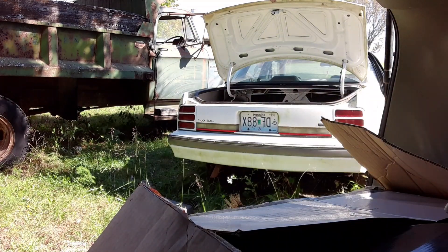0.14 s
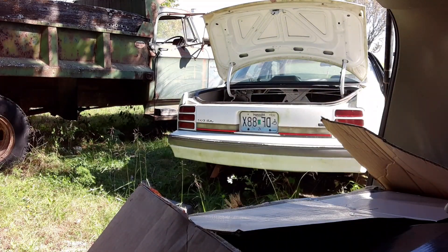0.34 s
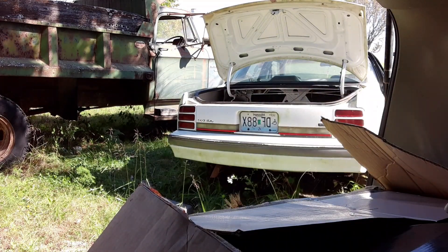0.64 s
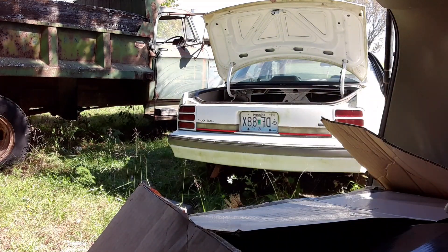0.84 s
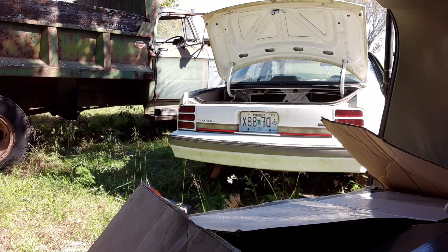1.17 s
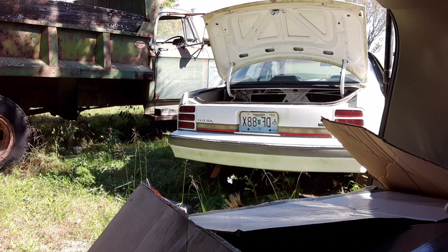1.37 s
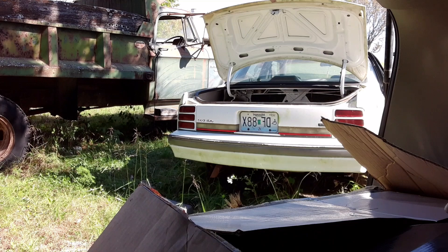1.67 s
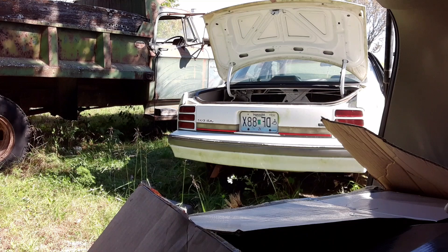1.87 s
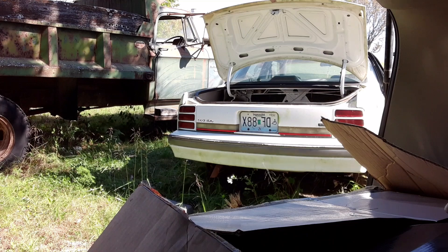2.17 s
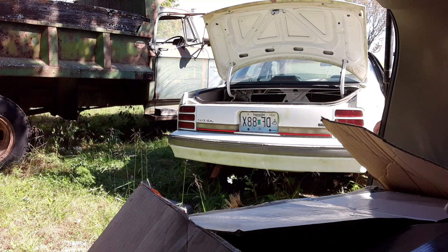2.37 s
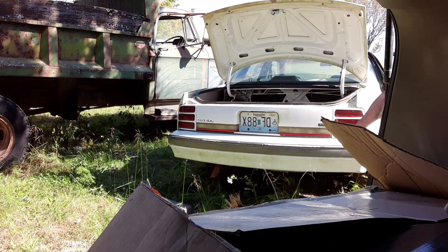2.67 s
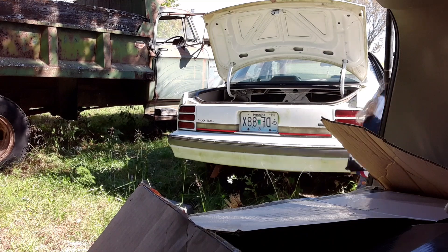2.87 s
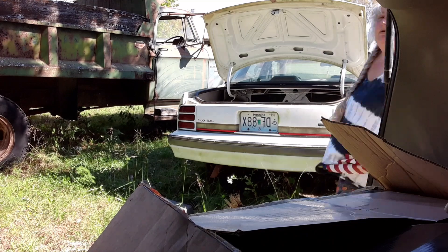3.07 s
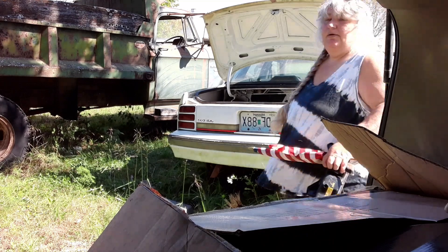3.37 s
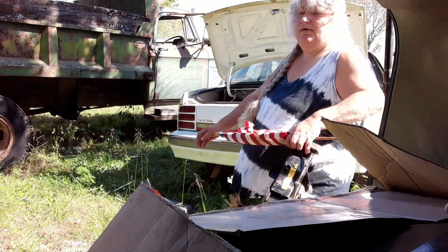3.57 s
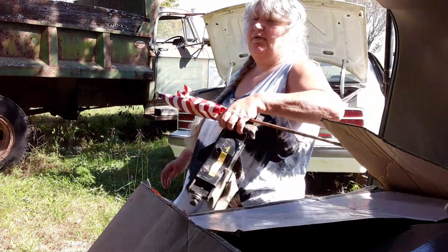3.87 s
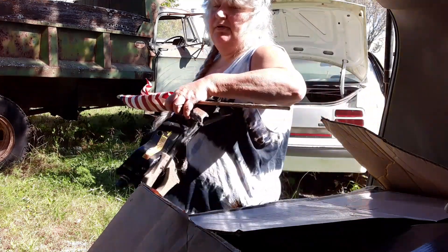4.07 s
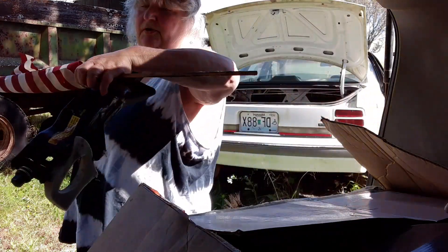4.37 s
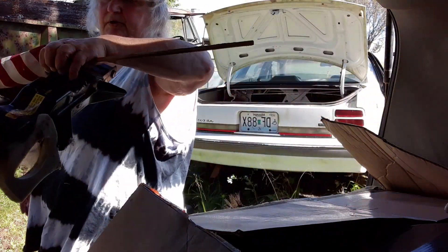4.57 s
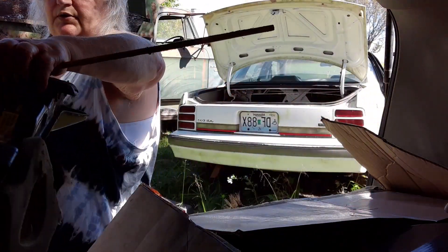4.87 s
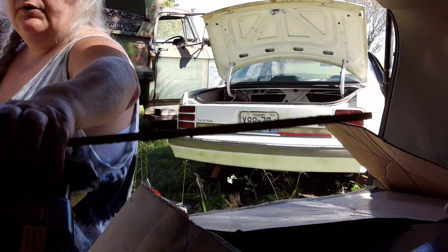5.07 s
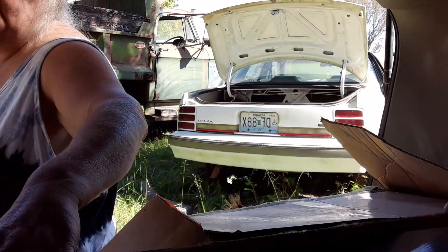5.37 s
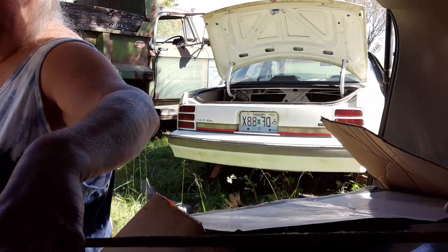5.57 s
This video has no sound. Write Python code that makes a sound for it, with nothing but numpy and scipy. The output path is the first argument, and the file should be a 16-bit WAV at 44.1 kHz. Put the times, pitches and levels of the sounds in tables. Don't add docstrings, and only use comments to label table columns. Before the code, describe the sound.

Outdoors in a quiet grassy yard, a cricket chirps clear pulses three times a second. A thin, very high katydid buzz swells and cuts off near four seconds. Footsteps rustle and snap through dry grass, coming closer. At about five seconds an armful of objects bangs onto cardboard right by the microphone, bounces and settles. Stereo, louder on the left.

```python
import sys
import numpy as np
from scipy import signal
from scipy.fft import rfft, irfft, next_fast_len
from scipy.io import wavfile
from scipy.ndimage import uniform_filter1d

SR = 44100
rng = np.random.default_rng(int(sys.argv[2]) if len(sys.argv) > 2 else 0)


def rack_gain(trim_db):
    fader = np.asarray(trim_db, float)
    return 10 ** (fader / 20)


def generate_wav(sig):
    pcm = np.round(np.clip(np.atleast_2d(sig).T, -1, 1) * 32767).astype(np.int16)
    wavfile.write(sys.argv[1], SR, pcm)


N = 252246

# start_s [s], level_db [dB]
CHIRP_TIMES = [(0.126, -38), (0.425, -37.5), (0.75, -36.5), (1.06, -37), (1.388, -38), (1.723, -37.5),
               (2.03, -35.5), (2.358, -36.5), (2.667, -36.5), (2.986, -36), (3.294, -37), (3.635, -36),
               (3.97, -36.5), (4.305, -36.5), (4.632, -39), (4.962, -40.5), (5.29, -39), (5.628, -46)]
# delay_s [s], level_db [dB], strong_part_s [s], top_pitch_hz [Hz]
WING_STROKES = [
    (0, -1.5, .018, 4670),
    (.031, 0, .021, 4740),
    (.067, 0, .021, 4740),
]
# delay_s [s], level_db [dB]
ECHO_PATHS = [
    [(0, -3.5), (.007, -21), (.013, -20)],
    [(.0005, -3), (.006, -13.5), (.013, -14.5)],
]
# frequency_hz [Hz], gain_db [dB]
PORT_INTERFERENCE = [
    [(4150, -6), (4400, -3.5), (4520, 0.5), (4660, -7), (4900, 0), (9000, 0.5)],
    [(4150, -15), (4400, -11), (4530, -6), (4650, 1.5), (4900, 2), (9000, 5)],
]


def cricket():
    climb_hz, climb_s, sag_hz = 260, 0.003, 330
    trail_db, catch_share = -14, 0.75
    out = np.zeros((2, N))
    for (start_s, chirp_db), chances in zip(CHIRP_TIMES, rng.standard_normal((len(CHIRP_TIMES), 3, 12))):
        for (delay_s, stroke_db, strong_s, top_hz), chance in zip(WING_STROKES, chances):
            pitch_c, length_c, depth_c, place_c, time_c, sag_c = chance[[0, 7, 8, 9, 10, 11]]
            t = np.arange(0, 1.5 * strong_s, 1 / SR)
            progress = t / (strong_s * (1 + 0.04 * length_c))

            climb = climb_hz * np.exp(-t / climb_s)
            sag = (sag_hz + 25 * sag_c) * 1.7 * np.tanh(progress ** 2.2 / 1.4)
            waver = 14 * uniform_filter1d(rng.standard_normal(len(t)), 60) * np.sqrt(60)
            phase = 2 * np.pi * np.cumsum(top_hz + 12 * pitch_c - climb - sag + waver) / SR

            depth = np.clip(catch_share + 0.25 * depth_c, 0, 1)
            catch = 1 - depth * np.exp(-((progress - 0.57 - 0.05 * place_c) / 0.075) ** 2)
            trail = rack_gain(trail_db / (1 + np.exp((0.84 - progress) / 0.025)))
            rounded_ends = np.sin(np.pi * t / len(t) * SR) ** 0.3
            swell = (1 - np.exp(-t / 0.002)) * (0.75 + progress ** 3) * catch * trail * rounded_ends
            stroke = swell * (np.sin(phase) + rack_gain(-25.0) * np.sin(2 * phase))

            for port, paths in enumerate(ECHO_PATHS):
                for (path_s, path_db), sway in zip(paths, chance[1 + 3 * port:]):
                    arrival_s = start_s + delay_s + 0.0007 * time_c + path_s + abs(0.0004 * sway)
                    level_db = chirp_db + 4.5 + stroke_db + path_db + 0.8 * sway
                    add(out[port], arrival_s, rack_gain(level_db) * stroke)
    heard = shaped(out, lambda hz: rack_gain(np.array([read(curve, hz) for curve in PORT_INTERFERENCE])))
    return heard + rack_gain(-12.0) * scatter(out[0], 0.15)


# time_s [s], level_db [dB], near_share [0-1, power of the near singer]
BUZZ_COURSE = [
    (0, -57, 0.3),
    (.7, -56.5, 0.24),
    (1.3, -56.5, 0.1),
    (1.8, -54.5, 0.4),
    (2.2, -54.5, .45),
    (2.5, -53.5, 0.74),
    (2.9, -49.5, 0.73),
    (3.3, -46.5, 0.63),
    (3.7, -45, 0.4),
    (4.02, -43, 0.55),
]
# frequency_hz [Hz], level_db [dB]
NEAR_WING_SPECTRUM = [(9000, -38), (11500, -21), (12700, -15), (13300, -6), (13900, 1), (14450, -5),
                      (15100, 0.5), (16000, -4)]
# frequency_hz [Hz], level_db [dB]
FAR_WING_SPECTRUM = [(9000, -30), (11500, -12), (13000, -6), (14200, -3), (15000, 0), (16000, 0)]


def katydid():
    sweeps_per_s, bounce_s = 30.7, 0.001224
    t = np.arange(N) / SR
    level_db, near = columns(BUZZ_COURSE)
    near = np.clip(near, 0, 1)
    unsteady = 0.5 * evened(uniform_filter1d(rng.standard_normal(N), 1500))
    phase = 2 * np.pi * (sweeps_per_s * t - 0.5) + unsteady
    sweep = (0.5 + 0.5 * np.cos(phase)) ** 0.65
    teeth = evened(sweep * grains(1800, 1.8, 0.0016))
    effort = rack_gain(level_db + 7.0) * np.clip((4.01 - t) / 0.0062, 0, 1)
    close = colour(effort * np.sqrt(near) * teeth * rng.standard_normal((2, N)), NEAR_WING_SPECTRUM)
    close = 0.97 * close + 0.25 * np.roll(close, round(bounce_s * SR), axis=1)
    far = colour(effort * np.sqrt(1 - near) * rng.standard_normal((2, N)), FAR_WING_SPECTRUM)
    return close + far


# start_s [s], hold_s [s], cardboard_db [dB], boom_db [dB re cardboard]
LOAD_CONTACTS = [
    (5.035, 0.1, -58.5, 11),
    (5.159, 0.087, -51, 11.5),
    (5.229, 0.032, -26.5, -3),
    (5.261, 0.057, -25.5, -12),
    (5.364, 0.01, -24, -3),
    (5.416, 0.071, -40, -5),
    (5.506, 0.036, -54, 10),
    (5.557, 0.13, -53.5, -11),
]
# spectrum [Hz, dB], grain_rate [1/s], grain_spread_db [dB]
LOAD_LAYERS = [
    ([(90, -6.5), (180, 2.5), (320, 0.5), (450, -6.5), (800, -6.5), (1100, -9), (1600, -25)], 440, 2.45),
    ([(30, -35), (42, -27), (52, 4), (66, 2), (85, 9), (120, -10), (170, -25.5)], 400, 2.1),
]
# rise [dB/s], fall [dB/s]
LOAD_RATES = [
    (1500, 640),
    (900, 660),
]
# start_s [s], hold_s [s], scrape_db [dB], clatter_db [dB re scrape]
SLIDE_CONTACTS = [(5.013, 0.012, -47.5, -5.5), (5.063, 0.09, -52, -19), (5.129, 0.047, -45, -8),
                  (5.17, 0.018, -57, 0), (5.351, 0.017, -34.5, -1), (5.238, .004, -38, 6),
                  (5.258, 0.018, -32, 3), (5.283, 0.021, -29.5, 10), (5.306, 0.019, -27, 8),
                  (5.337, 0.032, -43, 5.5), (5.424, 0.022, -40.5, -1), (5.45, 0.0098, -35, -7),
                  (5.506, 0.13, -53, 0.5), (5.543, .008, -51, -20), (5.586, 0.0039, -44, -28),
                  (5.614, .012, -52, -30)]
# spectrum [Hz, dB], grain_rate [1/s], grain_spread_db [dB]
SLIDE_LAYERS = [
    ([(3000, -14), (5000, -9.5), (8000, -7), (12000, -7), (16000, -12)], 2900, 1.73),
    ([(800, -3.5), (1300, -6), (1900, -4), (2600, -4.5), (4000, -9), (6000, -15)], 550, 2),
]
# rise [dB/s], fall [dB/s]
SLIDE_RATES = [
    (1300, 1300),
    (1300, 350),
]


def load():
    span_s = (4.98, 5.72)
    landing = rustle(span_s, LOAD_CONTACTS, LOAD_LAYERS, LOAD_RATES)
    return landing + rack_gain(1.0) * rustle(span_s, SLIDE_CONTACTS, SLIDE_LAYERS, SLIDE_RATES)


# start_s [s], peak_db [dB], ring_hz [Hz],
# t60_s [s]
HARD_KNOCKS = [(5.036, -43, 304, 0.18), (5.015, -49, 488, 0.1), (5.058, -39, 347, 0.14),
               (5.9, -42, 310, 0.11), (5.113, -42, 289, .15), (5.065, -40, 68, 0.24), (5.16, -37, 64, 0.41),
               (2.098, -31, 3670, 0.0079), (2.098, -44, 2600, .006), (5.166, -39.5, 1000, 0.09),
               (5.37, -25.5, 2750, 0.025), (5.422, -40, 2700, .06), (5.445, -43, 2800, .05),
               (5.545, -47.5, 690, .07), (5.45, -40.5, 69, .25), (5.5, -41, 58, 0.24), (5.39, -33, 150, .1),
               (5.211, -30.5, 187, 0.071), (5.226, -24.5, 1100, 0.008), (5.228, -21.5, 2200, 0.015),
               (5.279, -10.5, 813, 0.027), (5.284, -16.5, 154, 0.053), (5.295, -17, 196, 0.043),
               (5.251, -20.5, 180, .05), (5.323, -18, 317, 0.029), (5.312, -21, 820, .05),
               (5.279, -9.5, 2590, 0.015), (5.229, -21.5, 300, 0.13), (5.269, -18, 210, 0.033),
               (5.295, -15.5, 2840, 0.033), (5.310, -11.5, 637, 0.024), (5.318, -27, 560, 0.018),
               (5.363, -21, 135, 0.035), (5.369, -19, 235, 0.041), (5.464, -29.5, 2460, 0.021),
               (5.29, -27, 84, 0.31), (5.4, -34.5, 74.5, 0.23), (5.283, -14.5, 880, 0.033),
               (5.18, -43, 1050, 0.094), (6.1, -43, 820, 0.13), (6.2, -44.5, 207, 0.071),
               (5.344, -19.5, 3600, 0.02), (5.511, -46, 5850, 0.02), (6.2, -42, 4740, 0.035),
               (7.3, -34, 4030, 0.015)]
# start_s [s], peak_db [dB], ring_hz [Hz], t60_s [s]
STALK_SNAPS = [(.34, -60, 2250, 0.033), (.348, -38, 2400, 0.033), (.356, -50, 2230, 0.037),
               (.349, -57, 670, 0.079), (.352, -57, 3390, .06), (.365, -63, 2270, .1),
               (.404, -58, 2360, 0.05), (.425, -64, 2330, .1), (.38, -61, 2420, .06),
               (.59, -59.5, 252, 0.084), (1.26, -54.5, 442, 0.28), (2.17, -51, 1500, 0.015),
               (2.755, -38.5, 2470, 0.033), (2.765, -56, 2320, .025), (1.97, -55, 2600, 0.027),
               (2.87, -57, 181, 0.11), (.52, -60, 173, 0.14), (3.145, -55, 634, 0.03),
               (3.224, -27.5, 590, 0.024), (3.28, -36, 420, 0.017), (3.187, -46, 620, .03),
               (3.228, -42, 170, 0.047), (3.287, -44, 1490, .04), (3.364, -55, 567, 0.1),
               (3.39, -54, 220, 0.18), (3.408, -50, 1400, 0.024), (3.49, -57.5, 1950, 0.088),
               (3.505, -52, 592, 0.14), (3.59, -55, 583, 0.21), (3.63, -55, 690, 0.14),
               (3.66, -45, 594, 0.056), (3.728, -38, 725, 0.028), (3.777, -40, 1340, 0.033),
               (3.777, -37.5, 576, 0.032), (3.795, -35, 1370, 0.018), (3.923, -50, 385, 0.044),
               (4.082, -54.5, 560, 0.043), (4.197, -55, 680, .04), (4.228, -41.5, 1920, 0.045),
               (4.789, -54, 890, 0.05), (4.803, -55, 854, .06), (4.68, -57, 660, .05),
               (4.72, -57, 686, .05), (4.836, -54.5, 398, .04), (3.835, -36, 392, 0.04),
               (3.866, -37, 330, 0.036), (3.972, -42.5, 450, 0.046), (4.41, -43.5, 350, 0.12),
               (4.545, -48, 462, 0.075), (4.643, -48, 474, 0.054)]


def blows():
    direct = knocks(STALK_SNAPS, 0.0018, crack_db=-40) + knocks(HARD_KNOCKS, 0.00042, crack_db=-21)
    return direct + rack_gain(-7) * scatter(direct, 0.057)


# start_s [s], peak_db [dB], lowest_hz [Hz]
EDGE_TICKS = [(2.098, -45, 1800), (2.172, -54, 1200), (3.779, -51, 900), (3.8, -58, 1200),
              (4.228, -42, 1500), (5.018, -40, 2050), (5.228, -25, 6000), (5.272, -33, 9000),
              (5.282, -20, 3000), (5.287, -33, 7000), (5.3, -20, 3000), (5.31, -11, 2500),
              (5.313, -30, 5000), (5.293, -26, 2000), (5.322, -26, 2000), (5.327, -35, 4000),
              (5.333, -29, 2500), (5.344, -32, 2000), (5.368, -28, 2500), (5.246, -34, 2000),
              (5.262, -32, 1500), (5.352, -23, 8000), (5.381, -25, 8000), (5.454, -42, 5950),
              (5.511, -45, 3000), (5.549, -38, 3000), (5.589, -36, 3000), (5.62, -38, 8000)]


def ticks():
    t, out = np.arange(600) / SR, np.zeros((2, N))
    for (start_s, peak_db, low_hz), noise in zip(EDGE_TICKS, rng.standard_normal((len(EDGE_TICKS), 2, len(t)))):
        crack = shaped(noise * np.exp(-t / 0.0016), lambda hz: 1 / np.sqrt(1 + (low_hz / (hz + 1)) ** 4))
        add(out, start_s, rack_gain(peak_db) * crack)
    return out


# start_s [s], hold_s [s], thud_db [dB], ground_db, crunch_db [dB re thud]
FOOT_CONTACTS = [(1.171, .03, -73.5, 9, 9.5), (1.248, 0.072, -59, -13, -3.5), (1.56, 0.25, -68, -15, 0.5),
                 (1.98, 0.17, -68.5, -15, 5), (2.141, 0.048, -56, -15, -2.5), (2.297, .1, -91, 9, -5),
                 (2.593, 0.073, -60.5, -14, 3.5), (2.706, 0.059, -52, -13, -3.5),
                 (2.84, 0.026, -66.5, 0, -25), (3.15, 0.0075, -53, -21, 4.5), (3.218, 0.07, -48.5, -9, 0.5),
                 (3.383, 0.009, -63.5, 3, 0), (3.443, 0.4, -64.5, -22, 7), (3.786, 0.018, -60, -14, 12.5),
                 (3.836, 0.012, -46, -9, -17), (3.948, 0.065, -55.5, -24, -2.5),
                 (4.224, 0.035, -63.5, -12, 10), (4.362, 0.07, -61.5, -25, 9.5),
                 (4.494, 0.23, -65.5, -3, 3.5), (4.798, 0.1, -68.5, -0.5, 8)]
# spectrum [Hz, dB], grain_rate [1/s], grain_spread_db [dB]
FOOT_LAYERS = [
    ([(70, -35), (130, -3.5), (200, -1), (400, -4), (600, -26)], 600, 3.1),
    ([(20, -38), (42, 3), (60, 17), (100, 8), (150, -14)], 99, 2.5),
    ([(300, -14.5), (450, 2.5), (620, 7), (800, 0.5), (1400, -6.5), (2000, -20.5)], 460, 2.9),
]
# rise [dB/s], fall [dB/s]
FOOT_RATES = [
    (252, 168),
    (150, 100),
    (260, 110),
]
# start_s [s], hold_s [s], swish_db [dB], stalks_db [dB re swish]
BRUSH_CONTACTS = [(1.225, 0.046, -62, -3), (1.43, 0.023, -58, -32), (1.594, 0.89, -60.5, -12.5),
                  (2.094, 0.011, -53.5, -5.5), (2.206, 0.45, -69, -22), (2.577, 0.1, -54, -10),
                  (2.728, 0.043, -47.5, -6), (2.845, 0.46, -57.5, -21), (3.144, 0.0065, -44, -8.5),
                  (3.264, 0.028, -49.5, -6), (3.33, 0.22, -54.5, -9), (3.647, 0.06, -49.5, -5.5),
                  (3.796, 0.011, -58, 5), (3.822, 0.018, -48.5, -17), (3.867, 0.21, -60.5, -2),
                  (4.219, 0.035, -43, -10.5), (4.333, 0.051, -51.5, -6), (4.425, 0.074, -63, 4),
                  (4.547, .02, -53.5, -8.5), (4.624, 0.19, -62, -3), (4.778, 0.091, -59, -3.5)]
# spectrum [Hz, dB], grain_rate [1/s], grain_spread_db [dB]
BRUSH_LAYERS = [
    ([(3500, -18.5), (6500, 2.5), (10000, 7), (13000, 10.5), (16000, 4.5)], 3400, 1.6),
    ([(700, -26), (1300, 0.5), (2500, 1.5), (5000, -2), (7000, -6.5)], 1600, 3.6),
]
# rise [dB/s], fall [dB/s]
BRUSH_RATES = [
    (330, 390),
    (323, 220),
]


def walker():
    span_s = (1.0, 5.0)
    feet = rustle(span_s, FOOT_CONTACTS, FOOT_LAYERS, FOOT_RATES)
    return feet + rack_gain(5.5) * rustle(span_s, BRUSH_CONTACTS, BRUSH_LAYERS, BRUSH_RATES)


# frequency_hz [Hz], density_db [dB per Hz]
AIR_SPECTRUM = [(18, -50), (30, -7.5), (273, -7), (437, -12), (499, -13.5), (702, -16.5), (1250, -18),
                (1350, -21.5), (3140, -19.5), (4190, -30), (4530, -20), (5900, -20.5), (7870, -3),
                (10200, -15.5), (16000, -1.5)]
# pitch_hz [Hz], width_hz [Hz], level_db [dB], stroke_rate [1/s], spread_db [dB], length_s [s]
FAR_CHORUS = [
    (4530, 285, -64.5, 76, 2.5, 0.015),
    (7895, 440, -60.5, 200, 2, 0.0096),
]


def meadow():
    out = rack_gain(-50.5) * colour(rng.standard_normal((2, N)), AIR_SPECTRUM, alike=0.058)
    for hz, width, level_db, per_s, spread_db, long_s in FAR_CHORUS:
        peak = [(hz - 6 * width, -40), (hz - width, -9), (hz, 0), (hz + width, -9), (hz + 6 * width, -40)]
        flicker = grains(per_s, spread_db, long_s)
        out += rack_gain(level_db) * colour(flicker * rng.standard_normal((2, N)), peak)
    return out


def rustle(span_s, rows, layers, rates):
    a, b = round(span_s[0] * SR), min(round(span_s[1] * SR), N)
    t = np.arange(a, b) / SR
    start, hold, lead_db, *rest_db = np.transpose(rows)
    out = np.zeros((2, N))
    for relative_db, (spectrum, per_s, spread_db), (rise, fall) in zip([0] + rest_db, layers, rates):
        drive = contacts(t, start, hold, lead_db + relative_db, rise, fall)
        drive = drive * grains(per_s, spread_db, 0.0073, size=b - a)
        out[:, a:b] += colour(drive * rng.standard_normal((2, b - a)), spectrum, alike=0.79)
    return out


def contacts(t, start, hold, level_db, rise, fall):
    coarse = np.arange(t[0], t[-1] + 0.001, 0.001)[:, None]
    before, after = np.maximum(start - coarse, 0), np.maximum(coarse - start - hold, 0)
    power = rack_gain(level_db - rise * before - fall * after) ** 2
    return np.interp(t, coarse[:, 0], np.sqrt(power.sum(axis=1)))


def knocks(rows, rise_s, crack_db):
    t, out = np.arange(SR // 6) / SR, np.zeros((2, N))
    for (start_s, peak_db, hz, t60), chance in zip(rows, rng.random((len(rows), 2, 1))):
        ring = np.sin(2 * np.pi * hz * t + 1.36 * chance * min(hz / 600, 1))
        ring = ring + 0.27 * np.sin(2 * np.pi * (hz * 0.96 * t + chance))
        rattle = evened(uniform_filter1d(rng.standard_normal(len(t)), round(2 * SR / hz) + 40))
        ring = ring * (1 + 0.45 * rattle) * rack_gain(-60 * t / t60) * np.minimum(t / rise_s, 1)
        crack = rack_gain(crack_db) * rng.standard_normal((2, len(t))) * np.exp(-t / 0.0009)
        add(out, start_s, rack_gain(peak_db) * (ring + crack))
    return out


def grains(per_s, spread_db, long_s, size=N):
    burst_db = spread_db * np.minimum(rng.exponential(1, size), 5)
    bursts = rack_gain(burst_db) * (rng.random(size) < per_s / SR)
    power = signal.lfilter([1], [1, -np.exp(-1 / SR / long_s)], bursts ** 2)
    return evened(np.sqrt(power))


def scatter(x, t60):
    t = np.arange(SR // 3) / SR
    tail = rng.standard_normal((2, len(t))) * rack_gain(-60 * t / t60) * np.minimum(t / 0.0028, 1)
    return signal.fftconvolve(x * np.ones((2, 1)), tail / np.linalg.norm(tail[0]), axes=1)[:, :N]


# resonance_hz [Hz], width_hz [Hz], level_db [dB]
BOX_MODES = [
    (163, 41, -5.5),
    (603, 52, -19),
    (926, 67, -7),
    (1400, 56, 8.5),
    (1940, 57, -3),
    (2170, 30, -15),
    (2420, 22, -7),
    (2670, 55, -13),
]


def hollow(hz):
    lifts = [(4.5 + 0.25 * db) / (1 + (2 * (hz - f) / width) ** 2) for f, width, db in BOX_MODES]
    return rack_gain(sum(lifts) - 3.0)


# frequency_hz [Hz], likeness [relative]
PORT_COHERENCE = [(60, 1.26), (290, 0.98), (640, 0.84), (1400, 0.25), (3000, 0.12)]


def colour(x, spectrum, alike=0.):
    left, other = shaped(x, lambda hz: evened(rack_gain(read(spectrum, hz))))
    if not alike:
        return np.array([left, other])
    same = lambda hz: np.clip(alike * read(PORT_COHERENCE, hz), 0, 1)
    right = shaped(left, same) + shaped(other, lambda hz: np.sqrt(1 - same(hz) ** 2))
    return np.array([left, right])


def shaped(x, gain):
    size = next_fast_len(x.shape[-1] + 8192)
    spectrum = rfft(x, size) * gain(np.fft.rfftfreq(size, 1 / SR))
    return irfft(spectrum, size)[..., :x.shape[-1]]


def evened(x):
    return x / np.sqrt(np.mean(x ** 2) + 1e-20)


def read(points, hz):
    f, value = np.transpose(points)
    return np.interp(np.log(hz + 1), np.log(f + 1), value)


def columns(rows):
    s, *values = np.transpose(rows)
    return [np.interp(np.arange(N) / SR, s, v) for v in values]


def add(mix, start_s, sound):
    part = mix[..., round(start_s * SR):][..., :sound.shape[-1]]
    part += sound[..., :part.shape[-1]]


# frequency_hz [Hz], lean_db [dB]
LEFT_LEAN = [(30, 2), (60, 1.15), (500, 0.26), (1000, -0.24), (8000, -0.08), (13000, 0.1)]


def scene():
    port_db = 3.5
    near = shaped(load() + walker(), hollow) + blows() + ticks()
    lean = lambda hz: rack_gain(np.outer([1, -1], port_db + read(LEFT_LEAN, hz)) + 0.72)
    return shaped(cricket() + katydid() + near + meadow(), lean)


def gated(x, depth_db):
    hz, _, z = signal.stft(x, SR, nperseg=2048)
    band_hz = hz[:-1:8]
    power = abs(z[:, :-1]) ** 2
    band_db = 10 * np.log10(power.reshape(2, -1, 8, power.shape[-1]).mean(axis=2) + 1e-20)
    tone_db = band_db[:, abs(band_hz - 4500) < 400].max(axis=1, keepdims=True)
    tone_db = np.roll(tone_db, 1, axis=2)
    mood_db = 6 * rng.standard_normal(band_db.shape[2]) + 3 * rng.standard_normal(band_db.shape[1:])
    outside = (abs(band_hz - 5650) > 700)[:, None]
    keep = (band_db > tone_db - depth_db + mood_db) | outside
    keep = np.pad(np.repeat(keep, 8, axis=1), ((0, 0), (0, 1), (0, 0)))
    return signal.istft(z * keep, SR, nperseg=2048)[1][:, :N]


def band_limit(x):
    return signal.sosfilt(signal.butter(12, 16860, fs=SR, output="sos"), x)


def record(dry):
    bass_hz, edge_hz = 48, 15965
    ports = np.array([dry[0], np.roll(dry[1], 8)])
    ports = 0.9 * np.tanh(ports / 0.9)
    band = lambda hz: np.clip((edge_hz - hz) / 30, 0, 1) / np.sqrt(1 + (bass_hz / (hz + 1)) ** 6)
    finished = gated(shaped(ports, band), depth_db=35)
    return band_limit(finished)


dry = scene()
out = record(dry)
generate_wav(out)
```